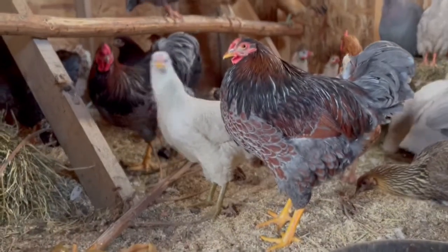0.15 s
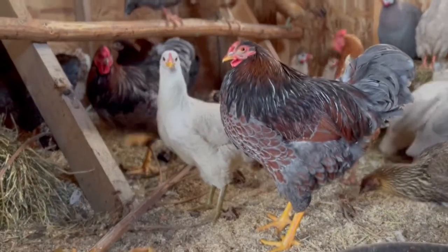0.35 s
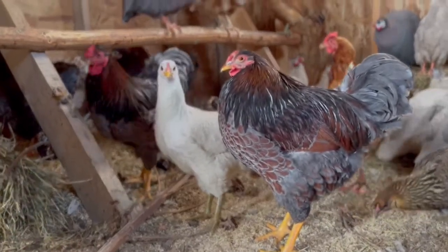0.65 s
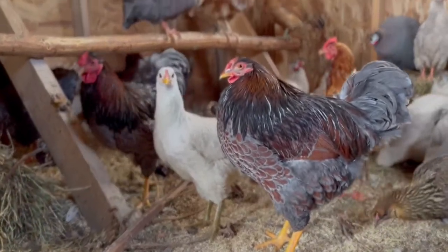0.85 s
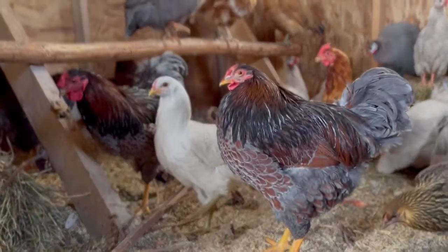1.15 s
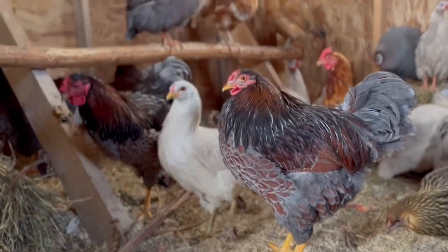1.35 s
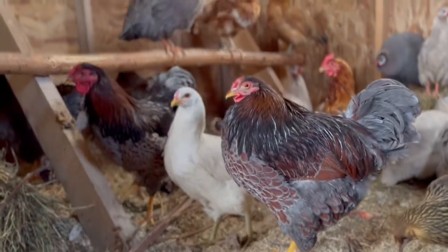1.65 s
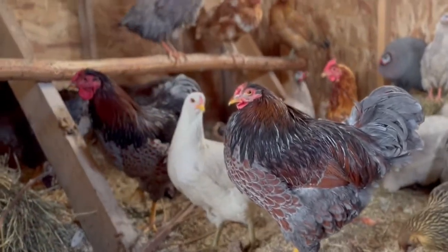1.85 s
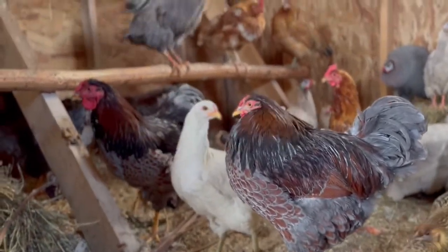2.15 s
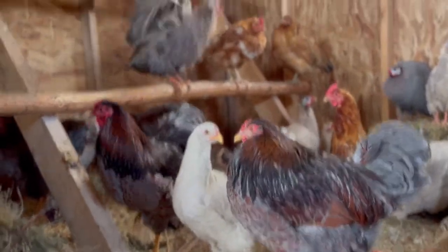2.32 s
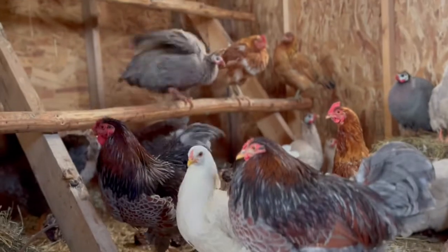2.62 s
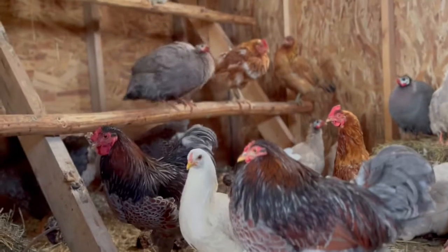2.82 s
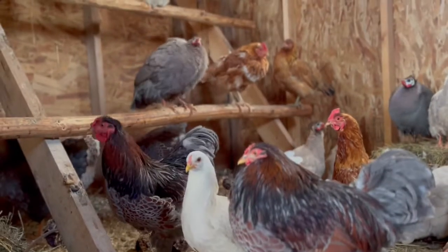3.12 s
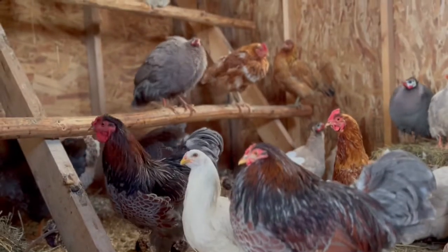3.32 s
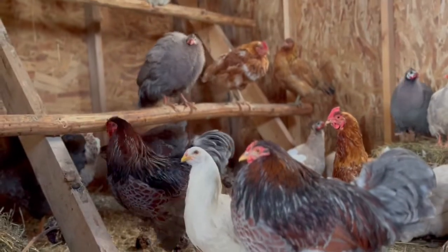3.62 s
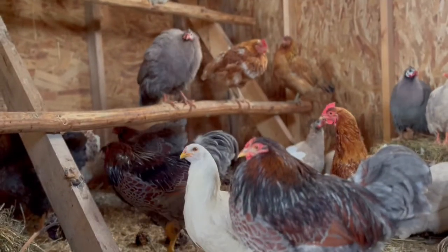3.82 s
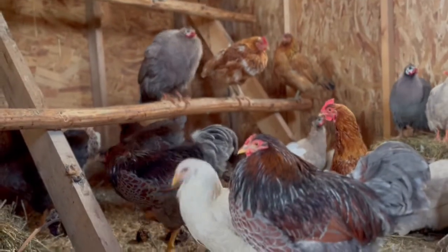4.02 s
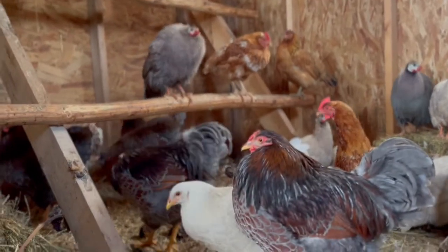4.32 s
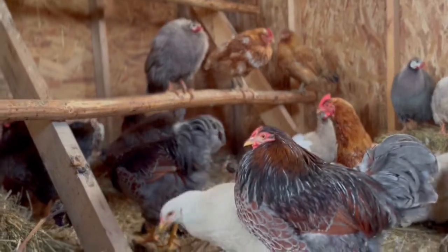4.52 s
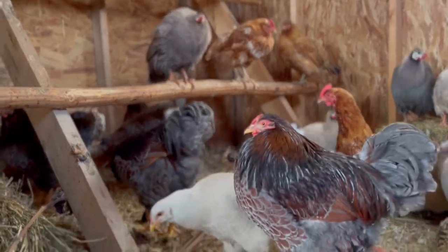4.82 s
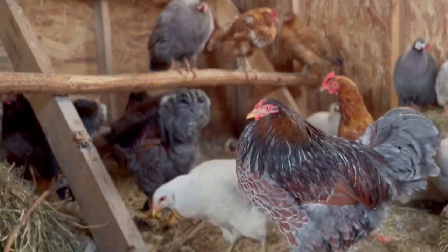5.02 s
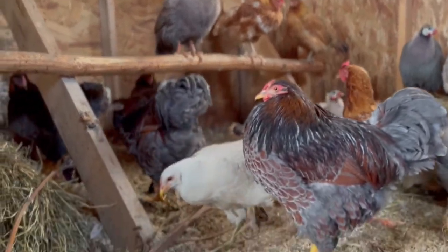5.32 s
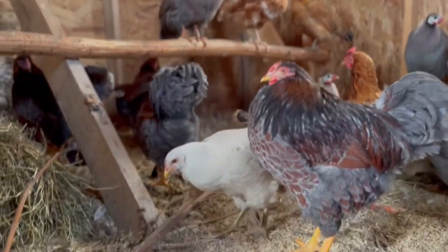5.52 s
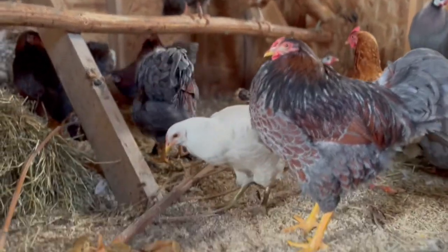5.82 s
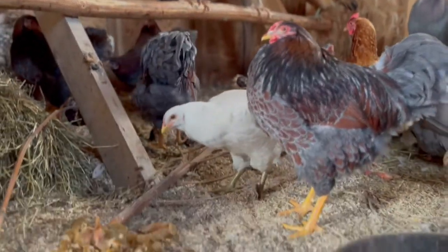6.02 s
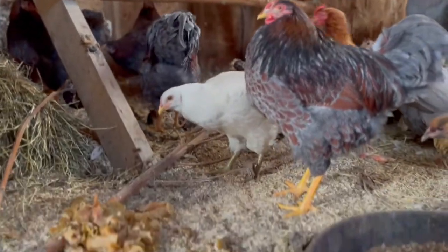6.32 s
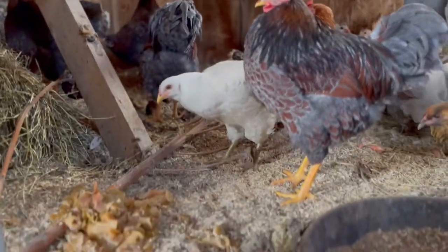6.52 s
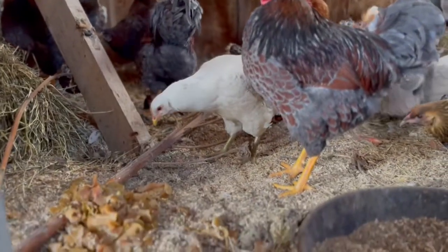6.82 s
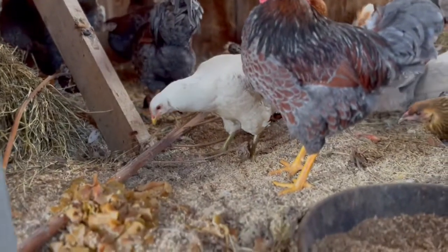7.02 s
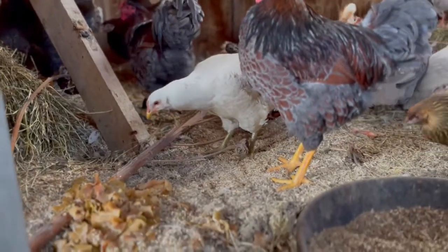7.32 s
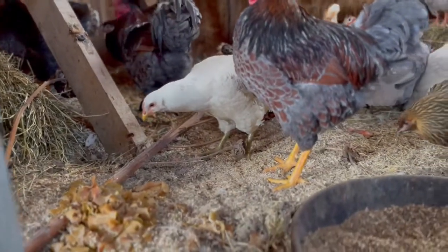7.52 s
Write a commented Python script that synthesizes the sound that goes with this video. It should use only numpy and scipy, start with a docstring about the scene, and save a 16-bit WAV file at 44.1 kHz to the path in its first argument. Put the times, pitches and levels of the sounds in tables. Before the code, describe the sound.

A small, dry plywood coop heard close up in stereo, nearly still, with faint air and a soft wavering low rumble. At the start a hen whines briefly, rising in steps, and another coos softly at 0.2 s. Claws scratch and straw ticks around 0.45 and 0.8 s. From about 2 to 2.7 s a guinea fowl flaps on its perch: uneven grainy feather strokes, dull thuds, a low gust, sharp straw snaps. A faint coo at 2.8 s precedes one raspy cluck at 2.9 s. A young bird yelps at 3.6 s, then whistles thinly; a low boom and thud land near 4.1 s. More yelps come at 4.8, 5.9 and, weaker, 6.1 s, between long trembling peeps with hoarse upward flicks, while a second bird pipes faintly. Straw rustles and snaps at 5.2-5.8 s. Muffled thuds come near 7 s, then last wavering whistles, a feather shake and straw at 7.4 s.

```python
"""A young bird yelps and peeps in long wavering whistles, made from trembling tones with a few overtones.
A second one pipes faintly; a hen whines and clucks once, its throat rung by pulses, and another hen coos.
A guinea fowl flaps on its perch: grainy noise swells with each wingbeat.
Feet scratch, feet and wings thud and straw snaps in a small plywood coop, from noise and random clicks.
Low noise booms softly with draughts, the wings' downdraught and a bird hopping down."""
import sys
import numpy as np
from scipy import signal
from scipy.fft import rfft, irfft, next_fast_len
from scipy.io import wavfile
from scipy.ndimage import uniform_filter1d

SR = 44100
rng = np.random.default_rng(int(sys.argv[2]) if len(sys.argv) > 2 else 0)


def master_out(mix):
    """Clip the mix to full scale and print it as 16-bit PCM to the path in sys.argv[1]."""
    frames = np.transpose(np.atleast_2d(mix))
    ceiling = np.clip(frames, -1, 1)
    pcm = np.round(ceiling * 32767).astype(np.int16)
    wavfile.write(sys.argv[1], SR, pcm)


N = 337806
TIME = np.arange(N) / SR

# All levels are relative: the mix, the coop and the microphones still change them.
# sound colour of the still coop: (frequency [Hz], level [dB])
QUIET_COLOUR = [(100, 0.5), (170, -10), (520, -14), (1200, -28), (3000, -32.5), (7000, -40), (11000, -35),
                (15500, -27.5)]
QUIET_DB = -73
# sound colour of the low booms: (frequency [Hz], level [dB])
RUMBLE_COLOUR = [(30, -19), (50, -3.5), (66, 9), (82, -5), (103, -16.5), (170, -24.5), (400, -45.5)]
# low booms of draughts, the wings' downdraught and a bird hopping down:
# (time [s], level [dB], rise [s], decay [s])
LOW_BOOMS = [(1.9, -50, 0.62, 1), (2.41, -39, 0.15, 0.18), (2.74, -40, 0.025, 0.01),
             (4.1, -34.5, 0.038, 0.074), (4.63, -49.5, 0.082, 0.066), (5.16, -49.5, 0.046, 0.15),
             (5.53, -45, 0.02, 0.085), (5.96, -44.5, 0.17, 0.1), (6.95, -54, 0.24, 0.26)]
BREEZE_DB, BREEZE_SWING_DB = -63, 3

# birds shuffling in the straw: (time [s], level [dB], rise [s], decay [s])
STRAW_SHUFFLES = [(.04, -71.5, 0.043, 0.041), (.79, -66.5, 0.059, 0.11), (1.4, -82, 1, 1),
                  (2.3, -72, 0.44, 0.37), (2.69, -63, 0.19, 0.019), (3.62, -68, 0.059, 0.24),
                  (4.53, -71, 0.279, 0.16), (5.2, -59.5, 0.097, 0.05), (5.35, -56, 0.077, 0.071),
                  (5.77, -64.5, 0.078, 0.11), (6.6, -82, 1, 0.61), (7.42, -64, 0.074, 0.091)]
# sound colour of straw: (frequency [Hz], level [dB])
STRAW_COLOUR = [(300, -23.5), (1500, -16), (4200, -14.5), (7000, -13), (9700, -8), (13000, -9.5),
                (15500, -11)]
STRAW_REST_DB = -105.5
# straws snapping and pecks: (time [s], peak [dB], ring [Hz], crisp treble [dB])
STRAW_SNAPS = [(0.4723, -49, 2580, -15), (0.7987, -41, 2560, -16), (0.813, -37, 1490, -16),
               (0.8678, -45.5, 4200, -10), (1.9721, -29.5, 4460, -13), (2.4525, -38.5, 3550, -15.5),
               (2.694, -26.5, 9440, -13.5), (3.535, -44.5, 7240, 5), (5.467, -29.5, 4560, 6),
               (5.694, -35, 4000, 6), (5.762, -34.5, 2110, -18), (7.406, -36.5, 5490, -3)]
# claws raking the litter: (time [s], level [dB], rise [s], decay [s])
CLAW_SCRATCHES = [(0.447, -55.5, 0.035, 0.042), (0.773, -54, 0.031, 0.0089), (5.306, -61.5, 0.017, 0.012),
                  (5.458, -57, 0.0085, 0.0059), (5.755, -52.5, 0.0042, 0.006),
                  (5.811, -58.5, 0.0074, 0.016), (7.36, -66, 0.038, 0.022)]
# sound colour of a scratch: (frequency [Hz], level [dB])
SCRATCH_COLOUR = [(200, -4.5), (1400, -15), (2650, -2.5), (4500, -15.5), (7000, -13), (10000, -16.5),
                  (15500, -22)]

# thuds of feet on the boards and of beating wings:
# (time [s], level [dB], contact cut-off [Hz], rise [s], decay [s])
THUD_HITS = [(0.814, -53.5, 2000, 0.0011, 0.0059), (2.183, -65, 380, 0.0017, 0.0055),
             (2.197, -55, 890, 0.0023, 0.01), (2.295, -55, 1190, 0.0026, 0.018),
             (2.319, -57.5, 530, 0.0038, 0.025), (2.358, -55, 1244, 0.0035, 0.029),
             (4.018, -55.5, 1030, 0.003, 0.017), (4.592, -66, 413, 0.0018, 0.015),
             (5.17, -62, 302, 0.0034, 0.03), (5.467, -62, 450, 0.004, 0.0083),
             (6.115, -57, 815, 0.0028, 0.022), (6.888, -49.5, 1194, 0.016, 0.0094),
             (7.054, -54.5, 1100, 0.01, 0.017), (7.202, -62, 331, .002, 0.0077),
             (7.435, -54.5, 400, .003, 0.016)]
# sound colour of the thuds: (frequency [Hz], level [dB])
THUD_COLOUR = [(120, 2.5), (200, 2), (320, -3.5), (660, -1.5), (900, -15), (1300, -7.5), (2400, -17.5)]
# a duller bump follows each thud
BUMP_DELAY_S, BUMP_HZ, BUMP_RISE_S, BUMP_DECAY_S, BUMP_DB = 0.0083, 365, 0.0093, 0.03, -9.5

# the guinea fowl beats its wings unevenly: (time [s], level [dB])
WINGBEAT_LEVELS = [(1.976, -53.5), (2.01, -51.5), (2.103, -54.5), (2.204, -49.5), (2.303, -56),
                   (2.386, -55.5), (2.479, -54.5), (2.575, -61.5), (2.662, -57)]
# sound colour of the wing feathers: (frequency [Hz], level [dB])
WING_COLOUR = [(110, 9), (230, -0.5), (520, -1), (700, -1), (860, -13.5), (1020, -7.5), (1400, -14.5),
               (2050, -13.5), (2700, -17), (15500, -24.5)]
WING_RISE_S, WING_DECAY_S = 0.024, 0.024
# rustle that lasts through the flapping: (time [s], level [dB], length [s])
FEATHER_RUSTLE = (2.34, -70, 0.15)
# a shake of feathers: (time [s], level [dB], length [s])
FEATHER_SHAKE = (7.395, -58.5, 0.11)

# soft falling notes from another hen: (time [s], length [s], first pitch [Hz], last pitch [Hz], level [dB])
COO_NOTES = [(.203, .06, 825, 735, -56), (2.785, .03, 800, 660, -56)]
# partials of a coo from the fundamental up: (level [dB])
COO_PARTIALS = [0, -20]
COO_FADE_DB = 18
# the hen's rising whine: (time [s], pitch [Hz], level [dB])
WHINE_CURVE = [(0, 791, -58), (.035, 790, -64.5), (.065, 908, -56), (.115, 910, -58.5), (.13, 1000, -58.5),
               (.155, 996, -50.5), (.19, 1021, -62.5), (.255, 1012, -71.5), (.32, 952, -80.5)]
# partials of the whine from the fundamental up: (level [dB])
WHINE_PARTIALS = [-0.5, -1.5, -21.5, -32]
WHINE_BEAK = 1   # dB of octave lift per dB of loudness
# clucks: (time [s], level [dB], swell [s], fade [s], pulse rate [1/s])
CLUCK_CALLS = [(2.931, -32, 0.0072, 0.0094, 163.5)]
# resonances of the clucking throat: (frequency [Hz], width [Hz], level [dB])
THROAT_RESONANCES = [(164, 30, -10.5), (300, 81, -9), (400, 51, -1.5), (493, 90, -9.5), (659, 107, 1),
                     (790, 105, -1.5), (1054, 130, -11), (1682, 300, -23), (2595, 270, -27)]

# a second young bird: (start [s], end [s], first pitch [Hz], last pitch [Hz], level [dB])
PIPING_NOTES = [(3.81, 3.885, 2200, 2210, -61), (4.015, 4.065, 2560, 2590, -60),
                (5.372, 5.71, 2610, 3480, -65)]
PIPING_CLIMB_POWER = 1.5
# partials of both whistling birds from the fundamental up: (level [dB])
PEEP_PARTIALS = [0, -31]
# phrases that begin level: (start [s], end [s], first pitch [Hz], last pitch [Hz], level [dB])
WHISTLE_PHRASES = [(3.736, 4.159, 2200, 2910, -58), (4.77, 4.817, 2340, 2520, -55),
                   (4.874, 5.147, 2323, 2298, -49.5), (5.178, 5.777, 2276, 3330, -57.5),
                   (6.011, 6.5, 2207, 2668, -59.5), (7.072, 7.485, 2400, 2814, -58.5)]
CLIMB_POWER, WHISTLE_EDGE_S = 2.3, 0.022   # the pitch changes ever faster
# the whistle flicks upward and falls back: (time [s], half length [s], leap [Hz], level change [dB])
WHISTLE_FLICKS = [(3.887, 0.037, 1311, -10), (3.983, 0.027, 512, -6.5), (4.08, 0.03, 400, -10.5),
                  (4.13, 0.024, 566, -7), (5.097, .031, 1333, -4.5), (5.227, 0.02, 274, 5),
                  (5.72, 0.027, 217.1, 3), (6.188, 0.036, 1130, -7), (6.284, 0.023, 600, -5.5),
                  (6.36, 0.016, 448, -3.5), (6.454, .028, 481, -5), (7.106, 0.018, 400, -2),
                  (7.308, 0.031, 1600, -7.5), (7.372, 0.021, 602, -2), (7.46, 0.034, 480, -6.5)]
FLICK_SQUARENESS = 3.375   # shape of the arch
FLICK_FALL_DB_PER_HZ = 0.0025   # per Hz of leap: weaker on the way up, stronger on the way down
FLICK_BREAK_DB = 7   # dip halfway up a big leap
FLICK_OVERTONE_DB = 15   # forcing the tone lifts its overtone
FLICK_FLUTTER_DB, FLICK_FLUTTER_PER_S = 3.5, 160   # the forced tone keeps breaking up
HOARSE_LEAP_HZ = 740   # smaller flicks stay cleaner
# share of noise around the held tone, share added at the top of a flick, and width of the noise
WHISTLE_BREATH, FLICK_BREATH, BREATH_WIDTH_HZ = 0.08, 1.8, 330

# yelps: (time [s], length [s], settled pitch [Hz], level [dB], beak lift per harmonic [dB], octave lift [dB])
YELP_CALLS = [(3.641, 0.0675, 1033, -43.5, -0.5, 1), (4.784, 0.07, 940.4, -38, 4, 1.5),
              (5.903, 0.064, 993, -38.5, 3, -9.5), (6.074, 0.072, 1029, -54.5, -2, 3)]
# partials of a yelp from the fundamental up: (level [dB])
YELP_PARTIALS = [0.5, -1, -7.5, -14, -27.5, -61]
YELP_SAG, YELP_SAG_S = 0.21, 0.01957   # starts sharp by this share and sinks with this time constant
YELP_ONSET_S, YELP_PEAK_S, YELP_SWELL_DB, YELP_FADE_DB = 0.014, 0.028, 13, 16.5
BEAK_SHUT_DB, BEAK_WIDEST_S, BEAK_OPEN_S = -1.5, 0.038, 0.0123
# colour of air hissing through a yelp: (frequency [Hz], level [dB])
RASP_COLOUR = [(3000, 12), (7000, -29.5), (10500, 11.5), (14000, -8.5)]
RASP_DB = -27

# reflections from nearby walls: (delay [s], strength [dB])
WALL_SLAPS = [(.0105, 7.5), (.0165, -8.5), (.0255, -8.5), (.038, -11.5)]
COOP_T60_S = 0.15   # time for the tail to sink by 60 dB
# phase lead of the left microphone port, a lag where negative: (frequency [Hz], phase [rad])
PORT_LEAD = [(0, 0), (5000, .5), (6000, -1), (7200, -2), (8300, -3.14), (11400, -6.1), (12400, -6.4),
             (15400, -9.4)]
CUTOFF_HZ = 15600


def from_db(db):
    """Decibels become a plain strength factor."""
    return 10 ** (np.asarray(db) / 20)


def rms_one(x):
    """Scale a sound to an average strength of 1."""
    return x / np.sqrt(np.mean(x ** 2) + 1e-20)


def in_time(rows):
    """Each column of a curve at every sample."""
    s, *columns = np.transpose(rows)
    return [np.interp(TIME, s, c) for c in columns]


def butter(x, hz, kind, order=2):
    """Keep only the low, high or band part of a sound."""
    sos = signal.butter(order, np.clip(hz, 10, 0.45 * SR), kind, fs=SR, output="sos")
    return signal.sosfilt(sos, x + 1e-18)


def drift(rate):
    """Random wandering: chance values of spread 1, rate per second, joined by straight lines."""
    knots = rng.standard_normal(int(N / SR * rate) + 2)
    return np.interp(TIME * rate, np.arange(len(knots)), knots)


def colour(x, spectrum):
    """Give x a spectrum, falling steeply beyond its ends; average strength 1."""
    hz, db = np.transpose(spectrum)
    size = next_fast_len(N)
    f = np.maximum(np.fft.rfftfreq(size, 1 / SR), 1)
    ends = np.minimum(1, np.minimum(f / hz[0], hz[-1] / f)) ** 3
    gain = from_db(np.interp(np.log(f), np.log(hz), db)) * ends
    return rms_one(irfft(rfft(x, size) * gain, size)[..., :N])


def spread(mid, side, side_db):
    """Left and right from a shared and an opposed part."""
    return rms_one(mid + from_db(side_db) * side * np.array([[1], [-1]]))


def noise(spectrum, side_db):
    """Steady stereo noise of the given colour."""
    return spread(*colour(rng.standard_normal((2, N)), spectrum), side_db)


def crackle(per_s, size_db):
    """Clicks at random moments, most of them faint and a few hard."""
    sizes = from_db(size_db * np.minimum(rng.exponential(1, (2, N)), 4.5))
    signs = rng.choice([-1, 1], (2, N))
    return sizes * signs * (rng.random((2, N)) < per_s / SR)


def swells(rows):
    """Level of overlapping movements, each rising to its peak and dying away; their powers add."""
    power = 0
    for s, db, rise, decay in rows:
        distance = np.maximum((s - TIME) / rise, (TIME - s) / decay)
        power = power + from_db(2 * db) * np.exp(-2 * distance)
    return np.sqrt(power)


def ring(x, hz, width):
    """A two-pole resonance of gain about 1 at its top."""
    r, w = np.exp(-np.pi * width / SR), 2 * np.pi * hz / SR
    return signal.lfilter([(1 - r * r) * np.sin(w)], [1, -2 * r * np.cos(w), r * r], x + 1e-18)


def syrinx(hz, db, partials, jitter, shimmer_db, strain, beak_db=0, octave_db=0):
    """A voice whose tone trembles more the higher it is forced; beak and throat lift its overtones."""
    tremble, flutter = drift(420)[:len(hz)], drift(148.9)[:len(hz)]
    rough = jitter + strain * (hz / hz.min() - 1) ** 2
    phase = 2 * np.pi * np.cumsum(hz * (1 + np.minimum(rough, 0.035) * tremble)) / SR
    k = np.arange(len(partials))[:, None]   # 0 is the fundamental, 1 the octave
    lift_db = np.minimum(k, 3) * beak_db + (k == 1) * octave_db
    weights = from_db(np.array(partials)[:, None] + lift_db)
    tone = (weights * np.sin((k + 1) * phase)).sum(0) / np.sqrt((weights ** 2).sum(0) / 2)
    return tone * from_db(db + shimmer_db * flutter) * signal.windows.tukey(len(hz), 0.06)


def hoarse(x, share, width_hz):
    """Uneven vibration smears each partial into a band: slow noise shakes the level."""
    shake = rms_one(butter(rng.standard_normal(N), width_hz, "low"))
    return x * (1 + share * shake) / np.hypot(1, share)


def coop(x, wet_db, pan_db=0):
    """Direct sound, slaps off the nearest plywood walls, then a dense tail partly alike on both sides."""
    t = TIME[:SR // 2]
    tail = butter(rng.standard_normal((2, len(t))), 6700, "low")
    tail = tail * from_db(-60 * t / COOP_T60_S) * (t > 0.012)
    response = 0.59 * spread(*tail, side_db=-6.5) / np.sqrt(len(t))
    for k, (delay, db) in enumerate(WALL_SLAPS):
        lag = 9 * (-1) ** k   # samples by which the right side comes later or earlier
        at = int(delay * SR)
        response[[0, 1], [at, at + lag]] += 0.26 * from_db(db)
    response *= from_db(wet_db)
    response[:, 0] += 1   # the direct sound
    sides = from_db([[pan_db / 2], [-pan_db / 2]])   # a positive pan leans left
    return signal.fftconvolve(np.atleast_2d(x), response, axes=1)[:, :N] * sides


def still_air():
    """Faint steady noise fills the quiet coop."""
    return from_db(QUIET_DB) * noise(QUIET_COLOUR, side_db=-8.5)


def low_booms():
    """Low noise wavers in the draught and swells with each boom of the table."""
    breeze = from_db(BREEZE_DB + BREEZE_SWING_DB * drift(5.7))
    level = np.hypot(swells(LOW_BOOMS), breeze)
    rumble = noise(RUMBLE_COLOUR, side_db=-25.5)
    # even out the noise, so that mainly the level above sets the slow swell
    strength = np.sqrt(uniform_filter1d(rumble[0] ** 2, size=5000) + 0.0067)
    return level * rumble / strength


def straw(level_db=3, clump_db=4.5):
    """Shifting feet and bodies keep the straw crackling in clumps, with a lone louder stalk now and then."""
    stir = np.hypot(swells(STRAW_SHUFFLES), from_db(STRAW_REST_DB))
    stalks = crackle(per_s=9000, size_db=4.0) + 3 * crackle(per_s=39, size_db=4.0)
    clumps = from_db(level_db + clump_db * drift(35))
    return stir * clumps * spread(*colour(stalks, STRAW_COLOUR), side_db=-4.5)


def scratches():
    """A claw drags through the litter, presses harder and lets go, making dense clicks."""
    force = np.zeros(N)
    for s, db, rise, decay in CLAW_SCRATCHES:
        press = np.interp(TIME, [s - 0.002, s, s + rise], [0, 0.4, 1])
        release = np.exp(-np.maximum(TIME - s - rise, 0) / decay)
        force += from_db(db) * press * release
    grains = colour(crackle(per_s=3400, size_db=4.5), SCRATCH_COLOUR)
    return force * spread(*grains, side_db=-9.5)


def snaps(crack_db=20, decay_s=0.0042, splinter_db=-16, splinter_s=0.021):
    """A dry stalk breaks: one sharp crack, a short buzz and a faint splintering tail of noise."""
    out, t = np.zeros(N + SR), TIME[:SR // 20]
    for s, db, hz, crisp_db in STRAW_SNAPS:
        fade = np.exp(-t / decay_s) + from_db(splinter_db) * np.exp(-t / splinter_s)
        burst = rng.standard_normal(len(t)) * fade
        burst[0] = from_db(crack_db)
        body = butter(burst, [hz / np.sqrt(2), hz * np.sqrt(2)], "band", order=1)
        tick = body + from_db(crisp_db) * butter(burst, 7200, "high")
        start = int(s * SR)
        out[start:start + len(t)] += from_db(db) * tick / np.abs(tick).max()
    return out[:N]


def thuds():
    """A foot or a beating wing gives a short low knock of noise, followed by a duller bump."""
    out = np.zeros(N)
    knock_noise, bump_noise = colour(rng.standard_normal((2, N)), THUD_COLOUR)
    t = TIME[:SR // 5]
    late = np.maximum(t - BUMP_DELAY_S, 0)
    bump_shape = (1 - np.exp(-late / BUMP_RISE_S)) * np.exp(-late / BUMP_DECAY_S)
    for s, db, contact_hz, rise, decay in THUD_HITS:
        at = slice(int(s * SR), int(s * SR) + len(t))
        hit = (1 - np.exp(-t / rise)) * np.exp(-t / decay)
        knock = butter(knock_noise[at] * hit, contact_hz, "low", order=3)
        bump = butter(bump_noise[at] * bump_shape, BUMP_HZ, "low", order=3)
        knock = knock / knock[:SR // 30].std()
        bump = from_db(BUMP_DB) * bump / bump[:SR // 20].std()
        out[at] += from_db(db) * (knock + bump)
    return out


def wings(flutter_db=2.5):
    """Every stroke pushes air through the feathers, whose vanes flick over one another in coarse grains."""
    rustle = np.zeros(N)
    for s, db, length in [FEATHER_RUSTLE, FEATHER_SHAKE]:
        rustle += from_db(db) * np.exp(-0.5 * ((TIME - s) / length) ** 2)
    strokes = swells([(s, db, WING_RISE_S, WING_DECAY_S) for s, db in WINGBEAT_LEVELS])
    vanes = colour(crackle(per_s=2200, size_db=3.5), WING_COLOUR)
    flutter = from_db(flutter_db * drift(110))
    return (strokes + rustle) * flutter * spread(*vanes, side_db=-11.5)


def coos():
    """Soft, nearly pure notes that sink and fade."""
    out = np.zeros(N)
    for s, length, first_hz, last_hz, db in COO_NOTES:
        on = (TIME >= s) & (TIME < s + length)
        along = (TIME[on] - s) / length
        pitch = first_hz + (last_hz - first_hz) * along
        level = db - COO_FADE_DB * along
        note = syrinx(pitch, level, COO_PARTIALS, jitter=0.015, shimmer_db=1.0, strain=0)
        out[on] += np.minimum(1, 5 * along) * note
    return out


def whine():
    """A complaint that rises in steps and trails off, brightest and hoarsest where it is loudest."""
    out, on = np.zeros(N), TIME <= WHINE_CURVE[-1][0]
    pitch, level = in_time(WHINE_CURVE)
    hz, db = pitch[on], level[on]
    bright_db = WHINE_BEAK * (db - db.mean())
    out[on] = syrinx(hz, db, WHINE_PARTIALS, jitter=0.022, shimmer_db=2.5, strain=0.02, octave_db=bright_db)
    return hoarse(out, share=0.272 * from_db(level - db.max()), width_hz=320)


def clucks():
    """A handful of slow, raspy pulses rings the throat."""
    out = np.zeros(N)
    for s, db, swell, fade, per_s in CLUCK_CALLS:
        cycle = np.floor((TIME - s) * per_s)
        rasp = rng.standard_normal(N) * np.sqrt(per_s / SR)
        pulses = np.diff(cycle, prepend=cycle[0]) + rasp
        pulses = pulses * np.exp(-0.5 * ((TIME - s) / np.where(TIME < s, swell, fade)) ** 2)
        call = np.zeros(N)
        for k, (hz, width, level) in enumerate(THROAT_RESONANCES):
            call += (-1) ** k * from_db(level) * ring(pulses, hz, width)
        out += from_db(db) * call / np.sqrt((call ** 2).sum() / (SR // 30))
    return out


def pipings():
    """Plain thin whistles that overlap the first bird's song."""
    out = np.zeros(N)
    for start, end, first_hz, last_hz, db in PIPING_NOTES:
        on = (TIME >= start) & (TIME < end)
        along = (TIME[on] - start) / (end - start)
        pitch = first_hz + (last_hz - first_hz) * along ** PIPING_CLIMB_POWER
        note = syrinx(pitch, db, PEEP_PARTIALS, jitter=0.011, shimmer_db=1.5, strain=0.06)
        out[on] += signal.windows.tukey(len(along), 0.3) * note
    return out


def whistles():
    """A thin tone glides ever faster and breaks into upward flicks, hoarse and ragged at their tops."""
    leap, change_db, overtone_db, forced, out = np.zeros((5, N))
    for s, half, hz, db in WHISTLE_FLICKS:
        near = np.abs(TIME - s) < 4 * half
        along = (TIME[near] - s) / half   # negative on the way up
        arch = np.exp(-np.abs(along) ** FLICK_SQUARENESS)
        effort = np.tanh(hz / HOARSE_LEAP_HZ)
        leap[near] += hz * arch
        change_db[near] += (db + FLICK_FALL_DB_PER_HZ * hz * along) * np.sqrt(arch)
        change_db[near] -= FLICK_BREAK_DB * 4 * arch * (1 - arch) * effort * (along < 0)
        overtone_db[near] += FLICK_OVERTONE_DB * np.sqrt(arch)
        forced[near] += arch * effort
    change_db += FLICK_FLUTTER_DB * forced * drift(FLICK_FLUTTER_PER_S)
    for start, end, first_hz, last_hz, db in WHISTLE_PHRASES:
        on = (TIME >= start) & (TIME < end)
        t = TIME[on]
        climb = ((t - start) / (end - start)) ** CLIMB_POWER
        pitch = first_hz + (last_hz - first_hz) * climb + leap[on]
        edges = np.minimum(1, np.minimum(t - start, end - t) / WHISTLE_EDGE_S)
        out[on] += edges * syrinx(pitch, db + change_db[on], PEEP_PARTIALS, jitter=0.011,
                                  shimmer_db=0.55, strain=0.05, octave_db=overtone_db[on])
    breathy = hoarse(out, WHISTLE_BREATH + FLICK_BREATH * forced, BREATH_WIDTH_HZ)
    return butter(breathy, 7600, "low", order=6)


def yelps():
    """A short note swells and fades while its pitch sags and the beak opens and shuts."""
    out = np.zeros(N)
    for s, length, hz, db, open_db, octave_db in YELP_CALLS:
        on = (TIME >= s) & (TIME < s + length)
        t = TIME[on] - s
        pitch = hz * (1 + YELP_SAG * np.exp(-t / YELP_SAG_S))
        swell = YELP_SWELL_DB * np.abs(1 - t / YELP_PEAK_S) ** 1.75
        fade = YELP_FADE_DB * ((t - YELP_PEAK_S) / (length - YELP_PEAK_S)) ** 2
        level = db - np.where(t < YELP_PEAK_S, swell, fade)
        opening = np.exp(-0.5 * ((t - BEAK_WIDEST_S) / BEAK_OPEN_S) ** 2)
        beak = BEAK_SHUT_DB + (open_db - BEAK_SHUT_DB) * opening
        note = syrinx(pitch, level, YELP_PARTIALS, jitter=0.014, shimmer_db=3.5, strain=0.35,
                      beak_db=beak, octave_db=octave_db)
        out[on] += np.minimum(1, t / YELP_ONSET_S) * note
    hiss = from_db(RASP_DB) * np.abs(out) * colour(rng.standard_normal(N), RASP_COLOUR)
    return hoarse(out, share=0.077, width_hz=840) + hiss


def scene():
    """Place the birds and their noises in the coop and add the straw, the booms and the still air."""
    litter = coop(scratches() + snaps(), wet_db=-8.0, pan_db=2.0)
    thumps = coop(thuds(), wet_db=-5.0, pan_db=1.24)
    flaps = from_db(-2.0) * coop(wings(), wet_db=-4.0, pan_db=0.5)
    hens = coop(whine() + coos(), wet_db=-4.5, pan_db=3)
    cluck = coop(clucks(), wet_db=-8, pan_db=1.5)
    peeps = from_db(-3.0) * coop(whistles() + pipings(), wet_db=-3.5, pan_db=0.5)
    yelp = coop(yelps(), wet_db=-6.5, pan_db=1.0)
    return still_air() + low_booms() + straw() + litter + thumps + flaps + hens + cluck + peeps + yelp


def record(dry):
    """Two close ports differ most in the middle range and in phase; left is brighter, the top is cut."""
    size = next_fast_len(N)
    hz = np.fft.rfftfreq(size, 1 / SR)
    left, right = rfft(dry, size)
    width = np.interp(hz, [100, 900, 5500, 8000], [1.2, 2.12, 1.4, 0.077])
    mid, side = (left + right) / 2, (left - right) / 2 * width
    presence_db = 3 * np.exp(-0.5 * ((hz - 4700) / 1000) ** 2)
    twist = np.exp(1j * np.interp(hz, *np.transpose(PORT_LEAD)))
    left_port = (mid + side) * twist * from_db(presence_db)
    right_port = (mid - side) * from_db(-presence_db)
    ports = irfft([left_port, right_port], size)[:, :N]
    return signal.sosfilt(signal.ellip(10, 0.1, 70, CUTOFF_HZ, fs=SR, output="sos"), ports)


dry = scene()
out = record(dry)
master_out(out)
```